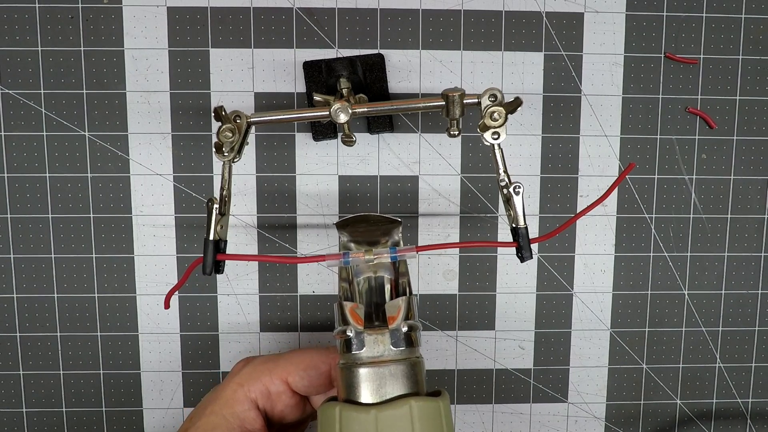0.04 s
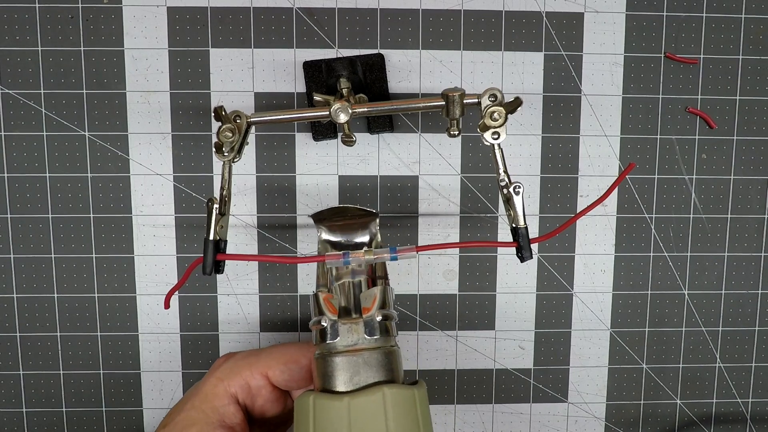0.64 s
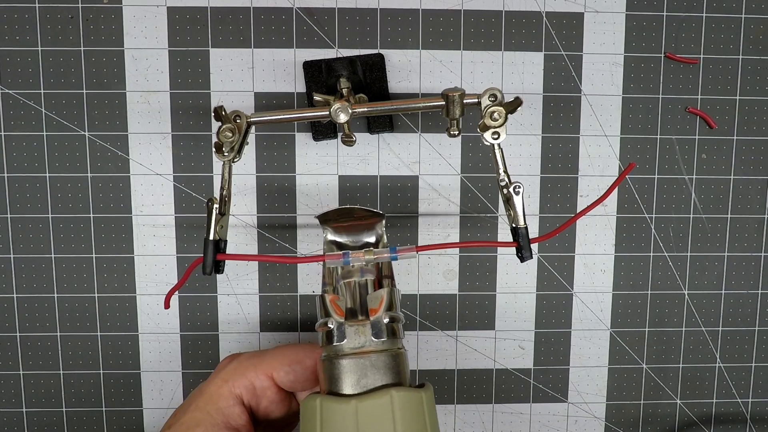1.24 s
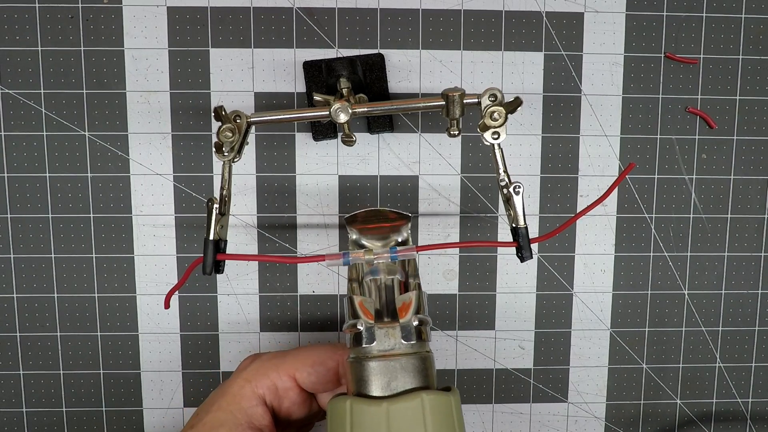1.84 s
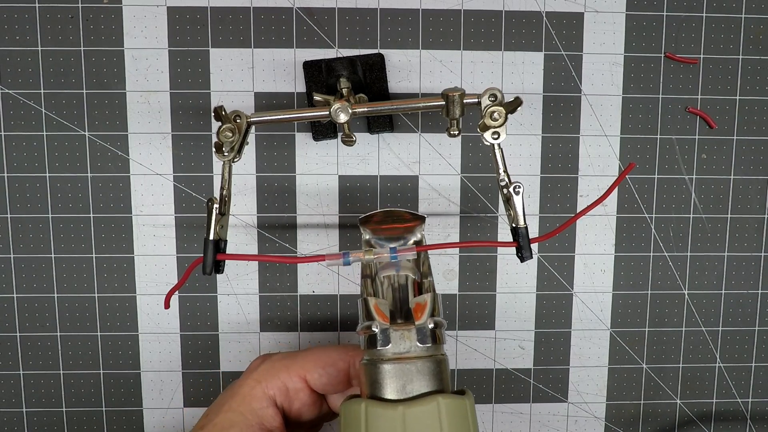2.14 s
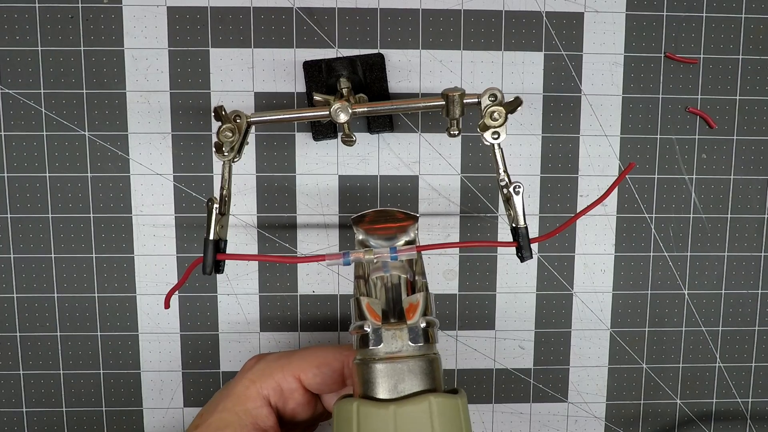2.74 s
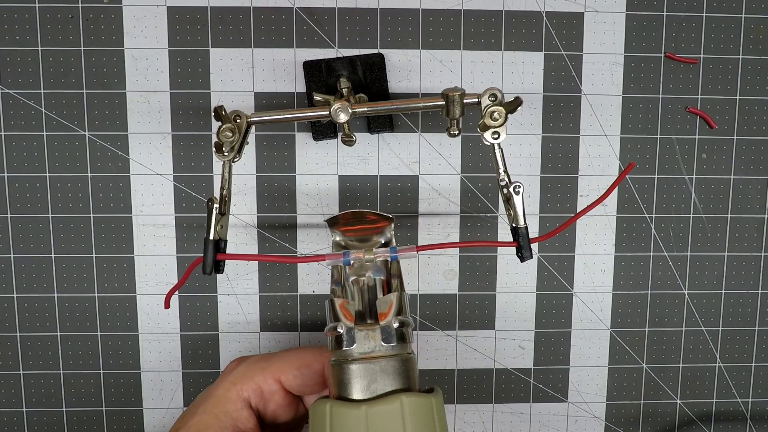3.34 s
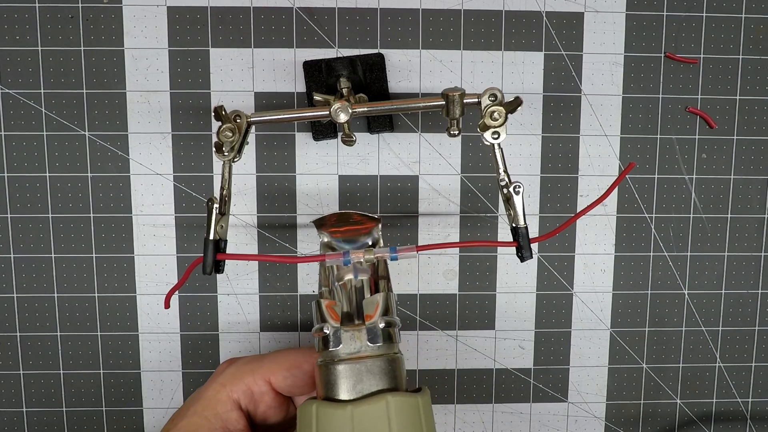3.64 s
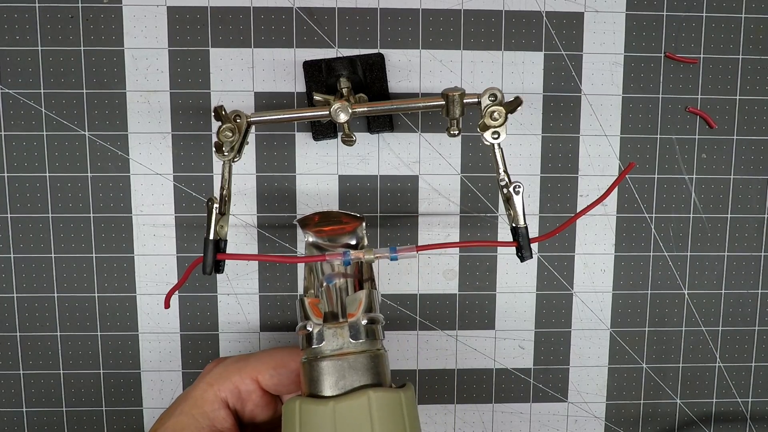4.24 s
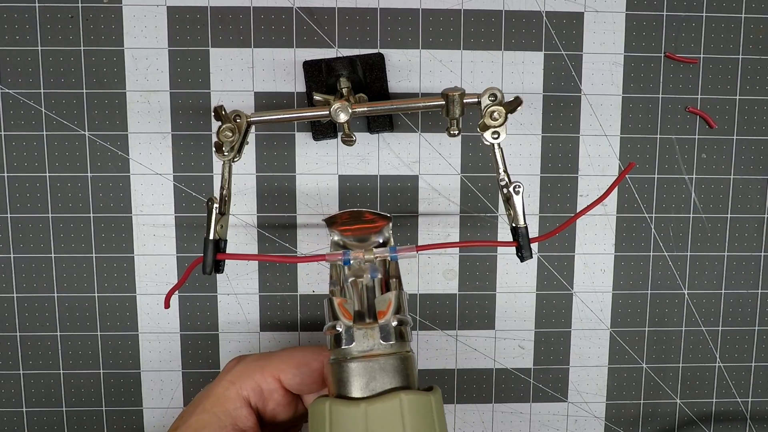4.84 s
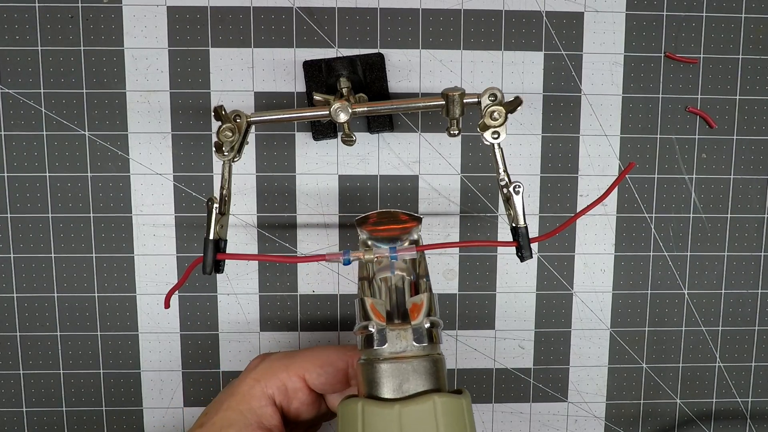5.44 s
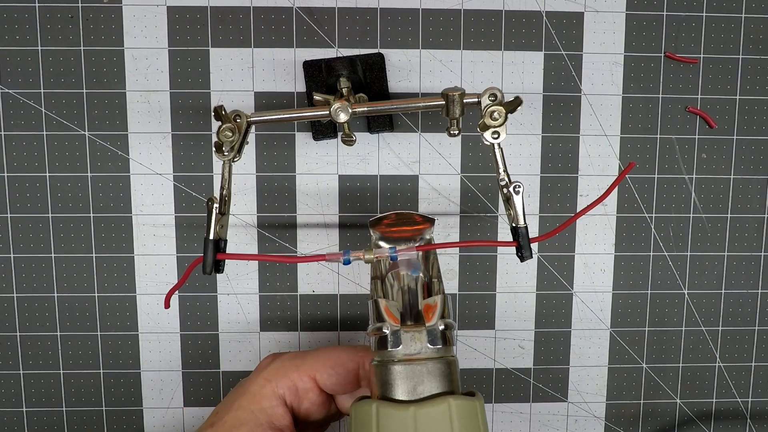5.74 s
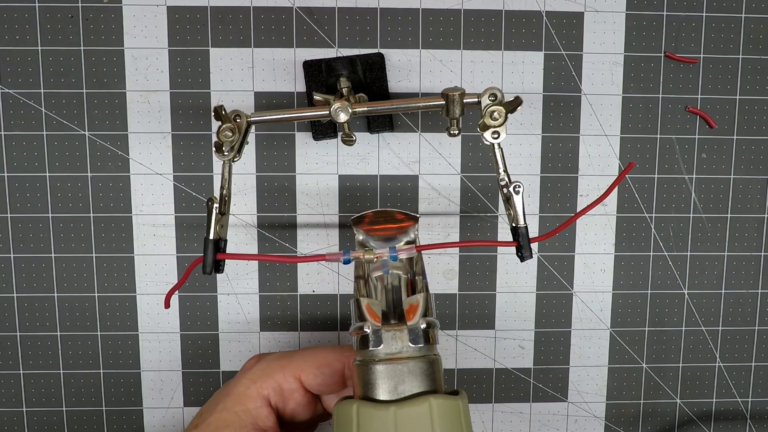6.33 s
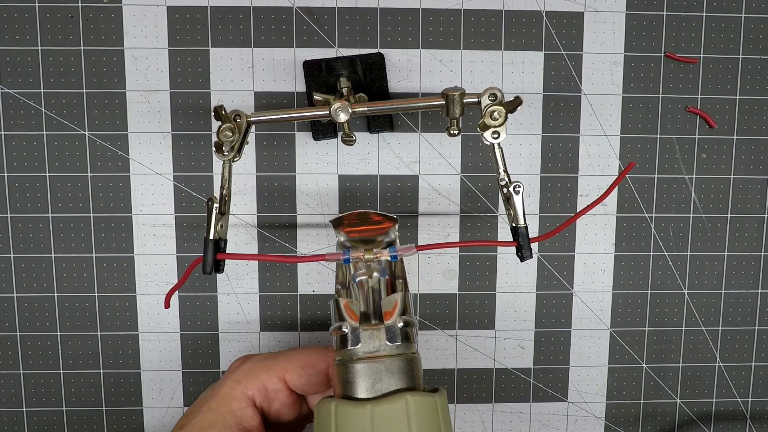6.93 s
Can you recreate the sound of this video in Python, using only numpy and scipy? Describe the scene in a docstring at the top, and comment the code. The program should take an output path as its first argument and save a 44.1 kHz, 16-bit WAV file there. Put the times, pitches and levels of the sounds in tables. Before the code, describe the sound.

A heat gun runs steadily up close, its fan giving a high whine over a rush of air.

```python
"""Heat gun over a wire splice

A heat gun, just coming up to speed, sweeps to and fro over a splice on a workbench, close and in mono.
Its fan sings a stack of shaft orders, with a high whine on the fifteenth, over air that rushes through
the resonant housing and a faint mains hum. The tones swell and fade as the gun moves through its own
reflections and as its air heats up."""
import sys
import numpy as np
from scipy import signal
from scipy.io import wavfile
from scipy.ndimage import uniform_filter1d

SR = 44100
rng = np.random.default_rng(int(sys.argv[2]) if len(sys.argv) > 2 else 0)


def output_pcm(signal):
    """Save a mono or channel-first signal as 16-bit PCM at the path in sys.argv[1].

    Samples are clipped to [-1, 1] before scaling.
    """
    pcm = np.clip(np.atleast_2d(signal).T, -1, 1) * 32767
    wavfile.write(sys.argv[1], SR, np.round(pcm).astype(np.int16))


N = 307818
TIME = np.arange(N) / SR

# the hand's sweep: t/s, nozzle place (negative left, positive right)
NOZZLE_PATH = [(0, 0.27), (.3, -0.29), (.85, -0.49), (1.4, 0.17), (2.3, .95), (3.2, 0.29), (4.2, -1.16),
               (5, 0.25), (5.8, 0.84), (6.98, -.05)]


def gain_of(db):
    """Decibels to amplitude."""
    return 10 ** (np.asarray(db) / 20)


def unit_rms(x):
    """Scales to rms 1."""
    return x / np.sqrt(np.mean(x ** 2) + 1e-20)


def level_at(spectrum, hz):
    """Reads a spectrum joined by straight lines on a log-frequency axis."""
    f, db = np.transpose(spectrum)
    return np.interp(np.log(hz + 1), np.log(f + 1), db)


def follow(curve, t):
    """Reads a control curve joined by straight lines in time."""
    return np.interp(t, *np.transpose(curve))


def wander(t, rate_hz):
    """Random modulation of rms 1: ten detuned sines, up to roughly the given rate."""
    f = np.geomspace(rate_hz / 10, rate_hz, 10)[:, None]
    phase, detune = rng.random((2, len(f), 1))
    sines = np.sin(2 * np.pi * (f * (1 + detune / 2) * t + phase))
    return unit_rms((sines / np.sqrt(f)).sum(0))


def shaft_speed(t, start_lack_hz=3.9, settle_s=0.44):
    """Turns per second: the motor closes in on its running speed."""
    # the slowly drifting speed it settles to: t/s, f/Hz
    running_speed = [(0, 275.9), (3.2, 275.96), (3.9, 275.56), (4.7, 275.28), (5.7, 274.68), (6.7, 275.1)]
    return follow(running_speed, t) - start_lack_hz * np.exp(-t / settle_s)


def mains_hum():
    """The mains current hums faintly in motor and heater."""
    # hum partials: f/Hz, level/dB
    partials = [(60, -75), (120, -69)]
    return sum(gain_of(db) * unit_rms(np.sin(2 * np.pi * (hz * TIME + rng.random())))
               for hz, db in partials)


def air_rush(level_db=-37.5, roar_hz=240, roar_width_hz=170, miss_db=-0.55, strike_db=2.5,
             splice_place=0.53, splice_half_width=0.47, hiss_hz=7600, hiss_width_hz=500, hiss_db=2.0):
    """Turbulence coloured by the housing; the jet roars on the splice, the hiss turns with the nozzle."""
    # broad bed of rushing air: f/Hz, relative level/dB
    rush = [(20, -16), (42, -25.5), (200, -18.5), (450, -20), (900, -21), (1260, -18.5), (1500, -10),
            (3000, -18.5), (5000, -21), (7000, -23), (9000, -27.5), (10000, -29.5), (12500, -33.5),
            (15100, -42)]
    # housing and nozzle resonances: f/Hz, half-power width/Hz, relative level/dB
    # the narrow one beside the fan's third order makes that tone throb
    resonances = [(249, 78, -17), (348, 40, -8.5), (602, 106, -12), (628, 19, -13), (699, 26, -8),
                  (787, 27, -8), (836, 13.5, -1), (880, 81, -4.5), (1041, 14, -1), (1103, 75, -4.5),
                  (1178, 53, -7.5), (1219, 25, -6.5), (1373, 78, -9.5), (1850, 81, -6.5), (1998, 62, 0.3),
                  (2240, 420, -8), (2517, 180, -1.4), (2693, 103, -5.5), (3110, 115, -12),
                  (3422, 100, -9.5), (3913, 200, -5.5), (4062, 114, -8), (4246, 59, -11),
                  (4600, 270, -13.5), (6120, 840, -22.5), (7520, 130, -18), (8020, 650, -24.5),
                  (9000, 325, -25)]
    size, hop = 4096, 1024
    hz = np.fft.rfftfreq(size, 1 / SR)
    t = np.arange(N // hop + 2)[:, None] * hop / SR
    real, imag, eddies = rng.standard_normal((3, len(t), len(hz)))
    peaks = [gain_of(db) / (1 + (np.sqrt(2) - 1) * (2 * (hz - f) / width) ** 2)
             for f, width, db in resonances]
    power = gain_of(level_at(rush, hz)) ** 2 + np.square(peaks).sum(0)
    place, speed = follow(NOZZLE_PATH, t), shaft_speed(t)
    body = 0.22 * (speed - speed.mean()) / (1 + (hz / 4500) ** 4)  # fills out as the fan gains speed
    on_splice = np.exp(-((place - splice_place) / splice_half_width) ** 2)
    roar = (miss_db + strike_db * on_splice) * np.exp(-((hz - roar_hz) / roar_width_hz) ** 2)
    hiss = hiss_db * place * np.exp(-((hz - hiss_hz) / hiss_width_hz) ** 2)  # beamed by the nozzle
    eddies = uniform_filter1d(eddies, size=6, axis=0)  # smeared in time
    eddies = uniform_filter1d(eddies, size=30, axis=1)  # and in frequency
    motion_db = body + roar + hiss + 0.62 * unit_rms(eddies)
    spectrum = (real + 1j * imag) * np.sqrt(power) * gain_of(motion_db)
    _, noise = signal.istft(spectrum.T, nperseg=size, noverlap=size - hop)
    return gain_of(level_db) * unit_rms(noise[:N])


def fan_tones(trim_db=-0.06, jitter=0.00019, warm_s=2.5, flow_s=0.69,
              drone_order=2, whine_order=15, top_order=55):
    """Shaft orders flutter in the turbulent air; the strong ones swell and fade with place and heat."""
    # strong tones: shaft order, level/dB, change with the nozzle at right/dB, change cold to hot/dB
    strong_tones = [(1, -57.5, 7.0, 5.6), (2, -51, 0, -10.5), (3, -49.5, -1, -1.5), (5, -54.1, 0, 3),
                    (6, -57, -1.3, -11.5), (7, -57, 4, 11), (8, -53.5, 1.2, 2), (9, -56.5, -3, 4),
                    (10, -59.5, -4.0, 7.0), (11, -58, -1, 1), (12, -64.5, 6, -5.9), (13, -66, -3.7, -2),
                    (14, -54, -1.0, -3), (15, -40.5, 1, -6), (16, -60, -3, -1), (17, -51.5, 1.5, 1.4),
                    (18, -61, -1.1, -5), (19, -59, -1.1, 20), (20, -56.5, 1, 8), (21, -66.5, 3.0, 7.5),
                    (22, -62, 3, -6.5), (23, -63.5, 1, 6.0), (25, -67, 2.1, -6.0), (29, -65.5, -6.9, -6.0),
                    (30, -69, -2, -15), (32, -69.5, -3, -3), (33, -74, -2, -8), (35, -65, -2.9, -4),
                    (36, -69.8, -2, -6), (37, -75, -1, 24.3), (42, -73.5, -3, 6.1), (45, -74.5, -2, -3),
                    (48, -72, -3, -3), (49, -70.5, 0, 7), (51, -77.5, 1, -5), (53, -81, 1, 8)]
    # contour of the weak orders between them: f/Hz, level/dB
    weak_tones = [(1100, -65), (6700, -67), (7200, -77), (8600, -75), (10000, -76), (10600, -78),
                  (11600, -74.5), (12000, -81), (13100, -74), (14300, -74), (15200, -83)]
    # thin whistles that swell once: peak t/s, half-power length/s, shaft order, peak level/dB
    whistles = [(.12, .2, 19, -58), (.38, 0.3, 35, -60.5), (.62, 0.34, 22, -52.5), (2.2, 1.3, 30, -62.5),
                (2.3, 3.2, 33, -63), (2.4, 1.6, 45, -67), (2.4, 1.7, 53, -69), (2.9, 2.2, 49, -63.5),
                (4.4, .8, 52, -72), (4.8, .9, 13, -58), (5.6, 1.1, 17, -52), (5.9, 1.1, 51, -64)]
    t = np.linspace(0, N / SR, N // 128)
    speed = shaft_speed(t) * (1 + jitter * wander(t, rate_hz=14))
    angle = 2 * np.pi * np.cumsum(np.interp(TIME, t, speed)) / SR
    place = follow(NOZZLE_PATH, t)
    heat = 1 - np.exp(-t / warm_s)
    level_db = {order: level_at(weak_tones, order * speed.mean()) + 3.0 * wander(t, rate_hz=1.15)
                for order in range(1, top_order + 1)}
    for order, db, side_db, hot_db in strong_tones:
        drift_db = (0.7 if order == whine_order else 0.65) * wander(t, rate_hz=1.516)
        level_db[order] = trim_db + db + side_db * place + hot_db * (heat - heat.mean()) + drift_db
    flow_lack = np.exp(-t / flow_s)  # the low drone and the blades' whine build with the airflow
    level_db[drone_order] -= 29 * flow_lack
    level_db[whine_order] -= 20 * flow_lack
    gains = {order: gain_of(db) for order, db in level_db.items()}
    for peak_s, length_s, order, db in whistles:
        swell = np.sqrt(0.5 ** ((2 * (t - peak_s) / length_s) ** 2))
        gains[order] = np.hypot(gains[order], gain_of(db) * swell)
    tones = np.zeros(N)
    for order, gain in gains.items():
        flutter = (0.055 if order == whine_order else 0.045) * wander(t, rate_hz=25)
        envelope = np.interp(TIME, t, gain * (1 + flutter))
        tones += envelope * np.sin(order * angle + 2 * np.pi * rng.random())
    return np.sqrt(2) * tones


def scene():
    """Fan, air and hum, alike in both channels."""
    gun = fan_tones() + air_rush() + mains_hum()
    return np.array([gun, gun])


def record(dry):
    """A steep low-pass takes off the very top."""
    lowpass = signal.firwin(511, cutoff=15250, window=("kaiser", 9), fs=SR)
    return signal.oaconvolve(dry, lowpass[None], "same")


dry = scene()
out = record(dry)
output_pcm(out)
```